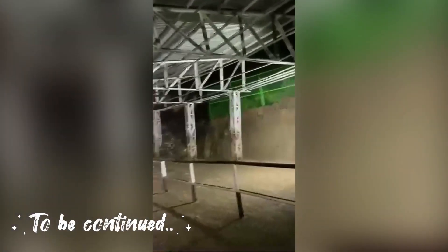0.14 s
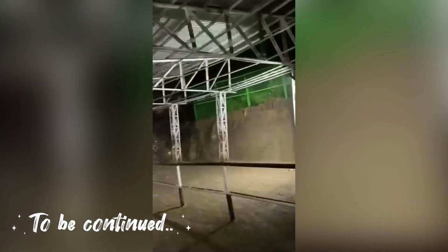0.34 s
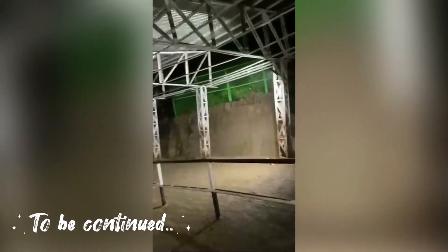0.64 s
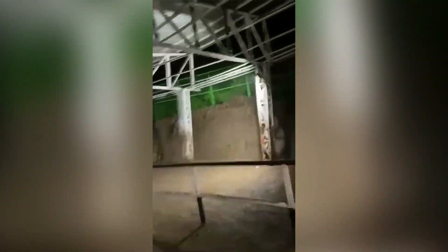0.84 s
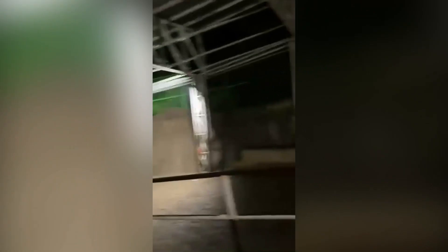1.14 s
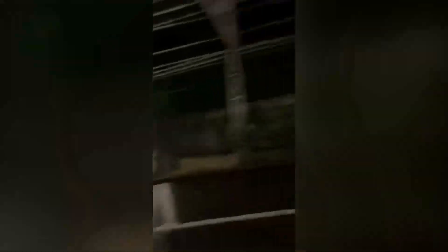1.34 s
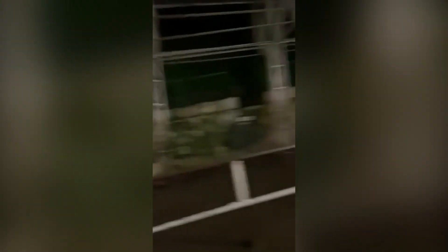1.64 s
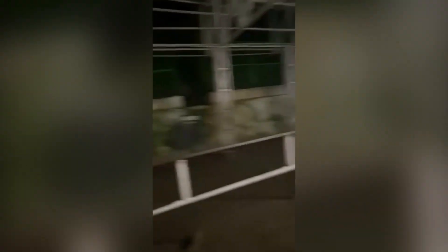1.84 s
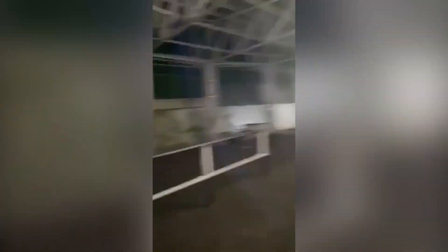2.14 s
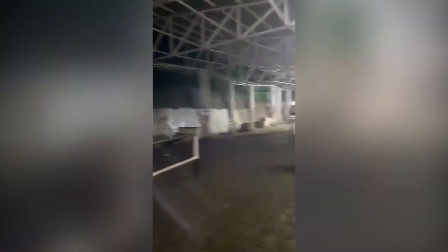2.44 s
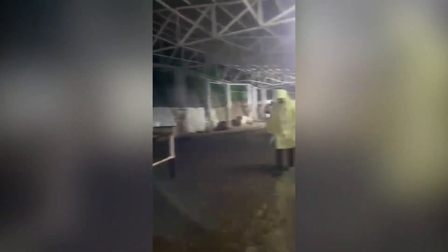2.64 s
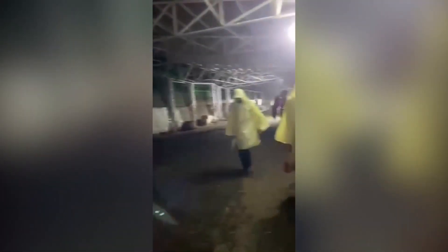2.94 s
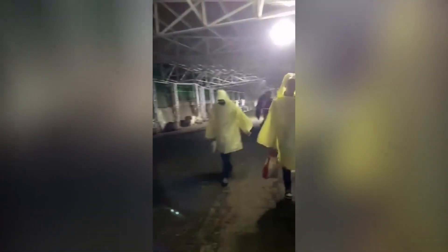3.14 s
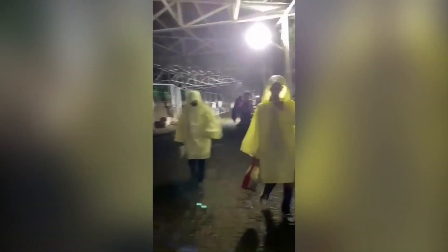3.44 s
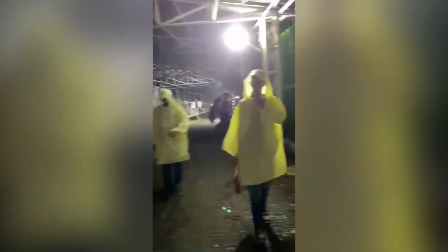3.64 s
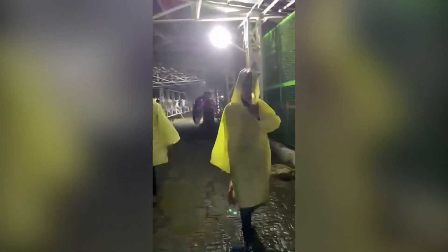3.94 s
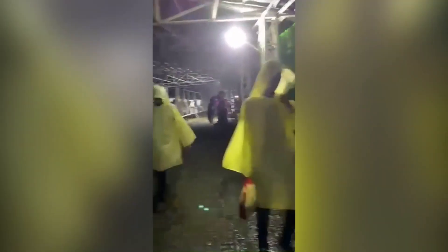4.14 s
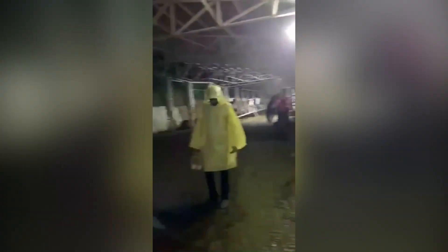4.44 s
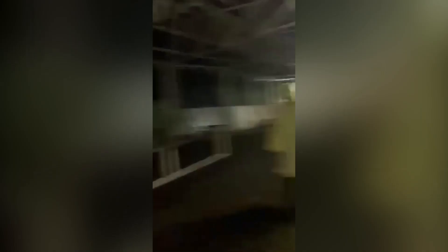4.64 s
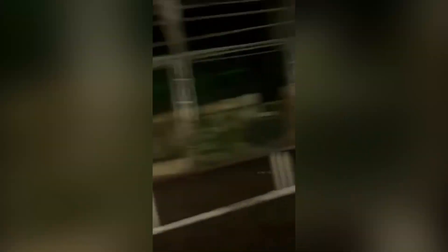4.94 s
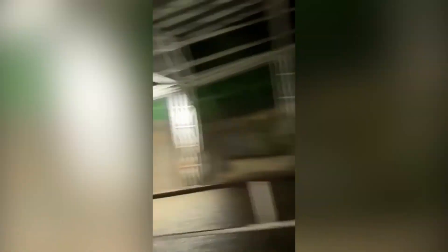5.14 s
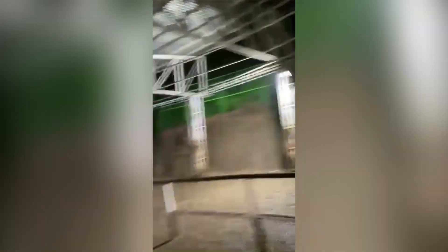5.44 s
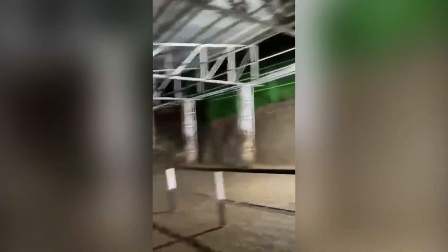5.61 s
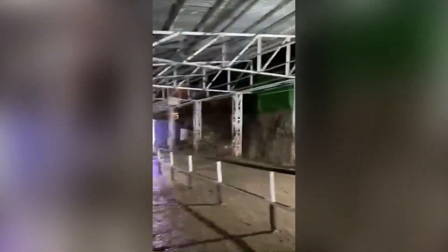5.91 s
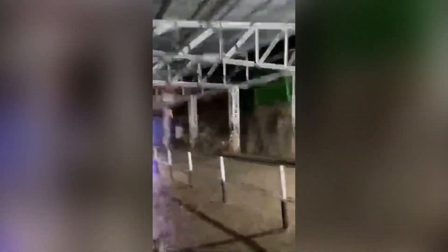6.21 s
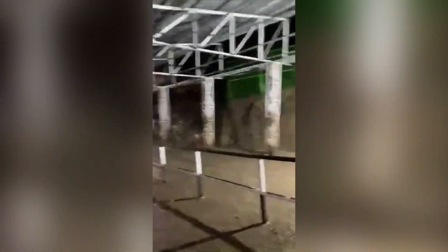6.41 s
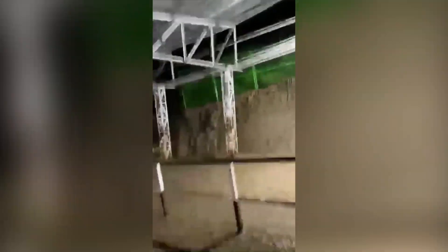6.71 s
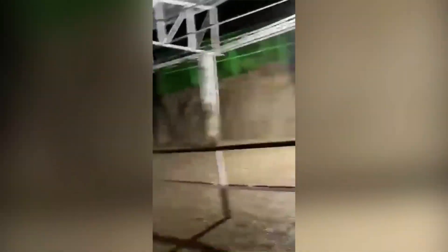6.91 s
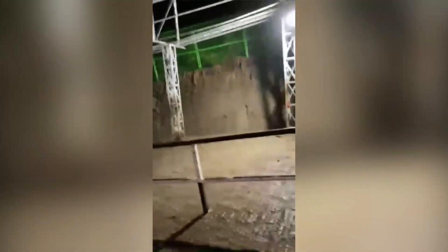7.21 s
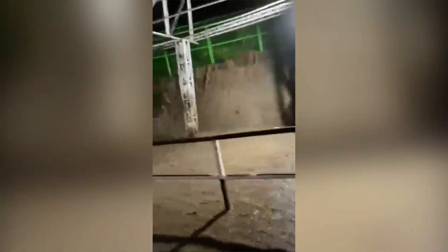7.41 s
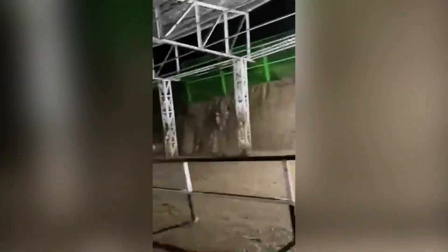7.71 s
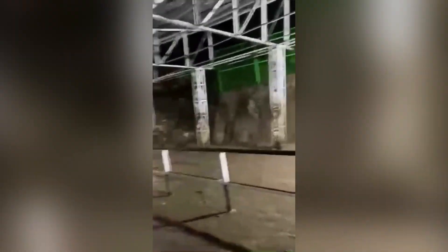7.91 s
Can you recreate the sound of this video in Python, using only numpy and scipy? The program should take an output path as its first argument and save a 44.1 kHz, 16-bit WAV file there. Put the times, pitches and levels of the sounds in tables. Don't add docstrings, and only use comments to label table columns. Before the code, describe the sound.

Heavy rain drums and hisses steadily on a long sheet-metal roof outdoors, slightly duller midway, with a bright rail ping and thin watery treble chirps.

```python
import sys
import numpy as np
from scipy import signal
from scipy.fft import rfft, irfft, next_fast_len
from scipy.io import wavfile
from scipy.ndimage import uniform_filter1d, map_coordinates

SR = 44100
rng = np.random.default_rng(int(sys.argv[2]) if len(sys.argv) > 2 else 0)


def to_wav(sig):
    pcm = np.clip(np.atleast_2d(sig), -1, 1) * 32767
    pcm = np.round(pcm).astype(np.int16)
    wavfile.write(sys.argv[1], SR, pcm.T)


def volts_from_decibels(level):
    exponent = np.asarray(level, float) / 20
    return 10 ** exponent


N = 355754
THIN_S = 3.2
FINE_HZ, FINEST_HZ = 5900, 6800


def unit(x):
    return x / np.sqrt(np.mean(x ** 2) + 1e-20)


def along(points, hz):
    f, v = np.transpose(points)
    return np.interp(np.log(hz + 1), np.log(f + 1), v)


def wobble(rate):
    knots = rng.standard_normal(int(N * 40 / SR) + 4)
    return map_coordinates(knots, [np.arange(N) * np.clip(rate, .1, 40) / SR])


def filtered(x, response):
    m = next_fast_len(N + 8192)
    return irfft(rfft(x, m) * response(np.fft.rfftfreq(m, 1 / SR)), m)[:N]


def rain():
    # frequency_hz, level_db (per Hz)
    drum_spectrum = [(18, -73.5), (25, -27.5), (32, -21), (40, -1), (60, 2.5), (85, 3.5), (108, 3.5),
                     (130, 6.5), (250, 5), (380, 3.5), (500, -16), (800, -24), (1300, -120)]
    # frequency_hz, level_db (per Hz)
    patter_spectrum = [(250, -19.5), (400, -1), (700, -2.5), (1000, -3.5), (1500, -4.5), (2200, -6.5),
                       (3000, -11), (3800, -26), (5000, -120)]
    # frequency_hz, level_db (per Hz)
    splash_spectrum = [(2200, -120), (2400, -14), (3000, 0), (4000, -.5), (4500, -2), (4900, -4.5),
                       (5600, -3), (6250, -3.7), (6330, -7), (6850, -9), (6920, -11.5), (7100, -14.5),
                       (7350, -20), (7420, -140)]
    # time_s, angle_deg
    heading = [(0, 28), (.5, 85), (1, 65), (1.6, 97), (2.3, 150), (3.5, 200), (4.5, 163), (5.1, 33),
               (5.8, 14), (6.5, 28), (7.3, 17), (8.07, 36)]
    t = np.arange(N) / SR
    angle = np.radians(np.interp(t, *np.transpose(heading)))
    away = (1 - np.cos(angle)) / 2
    gust = wobble(9)

    drum_db = -28 - 0.4 * away + 0.1838 * t + 0.22 * gust
    patter_db = -22 - 2.5 * away + 0.1 * gust + 0.047 * wobble(14)
    splash_db = -27 - 2 * away + 0.26 * gust + 0.41 * wobble(20)

    drum = drops(drum_spectrum, share=.02, spread_db=3.5, far_db=5.5, patchy_db=-0.13)
    patter = drops(patter_spectrum, share=.05, spread_db=3, far_db=6.0, patchy_db=.5)
    splash = drops(splash_spectrum, share=.08, spread_db=3.5, far_db=5.0, patchy_db=0.73)
    return volts_from_decibels(drum_db) * drum + volts_from_decibels(patter_db) * patter + thinning(volts_from_decibels(splash_db) * splash)


def drops(spectrum, share, spread_db, far_db, patchy_db):
    draw = rng.random((3, N))
    size = volts_from_decibels(-spread_db * np.log(np.maximum(draw[1], 1 / 40)))
    blows = unit((draw[0] < share) * size * np.sign(draw[2] - .5))
    mix = blows + volts_from_decibels(-3.5) * ringing(blows) + volts_from_decibels(far_db) * rng.standard_normal(N)

    z = signal.stft(mix, nperseg=512)[2]
    field = uniform_filter1d(rng.standard_normal(z.shape), size=5, axis=0)
    field = uniform_filter1d(field, size=10, axis=1)
    mix = signal.istft(z * volts_from_decibels(patchy_db * unit(field)), nperseg=512)[1][:N]
    return unit(filtered(mix, lambda hz: volts_from_decibels(along(spectrum, hz))))


def ringing(x):
    # frequency_hz, t60_s
    shelter = [(100, 0.28), (1000, 0.28), (6000, 0.12)]
    hz, t, z = signal.stft(rng.standard_normal(SR // 2), SR, nperseg=256)
    decay = volts_from_decibels(-60 * t / along(shelter, hz)[:, None])
    tail = signal.istft(z * decay, SR, nperseg=256)[1]
    out = np.zeros(N + SR)
    for part in np.array_split(np.arange(N), 24):
        signs = rng.choice([-1, 1], len(tail) // 64 + 1).repeat(64)[:len(tail)]
        answer = signal.fftconvolve(x[part], tail * signs)
        out[part[0]:part[0] + len(answer)] += answer
    return unit(out[:N])


def thinning(splash):
    early_db, late_db, flicker_db, over_s = .5, -3.5, 1.5, .3
    late = (1 + np.tanh((np.arange(N) / SR - THIN_S) / over_s)) / 2
    fine_db = early_db + (late_db - early_db) * late + flicker_db * wobble(10)
    fine = filtered(splash, lambda hz: np.clip((hz - FINE_HZ) / (FINEST_HZ - FINE_HZ), 0, 1))
    return splash + (volts_from_decibels(fine_db) - 1) * fine


def pings():
    # start_s, peak_db, pitch_hz, t60_s
    near_drops = [
        (.40, -22, 1100, .12),
        (3.708, -13, 4190, .045),
        (3.722, -20, 4120, .04),
        (5.29, -23, 3450, .08),
    ]
    out, t = np.zeros(N + SR), np.arange(SR // 5) / SR
    for s, db, hz, t60 in near_drops:
        pair = np.sin(2 * np.pi * hz * t) + .45 * np.sin(2 * np.pi * .94 * hz * t)
        attack = 1 - np.exp(-(t / .001) ** 2)
        out[round(s * SR):][:len(t)] += volts_from_decibels(db - 60 * t / t60) * attack * pair
    return out[:N]


def blips():
    # centre_s, peak_db, centre_hz, spread_hz
    bursts = [
        (.394, -59, 10680, 690),
        (1.509, -52, 7950, 690),
        (2.066, -49, 7930, 400),
        (2.089, -58, 11050, 30),
        (3.854, -51, 11200, 260),
        (4.318, -49, 7770, 580),
        (5.549, -46.5, 11440, 520),
        (6.060, -53.5, 11450, 280),
        (6.315, -47, 8060, 217),
    ]
    gain_db = 4
    out, t = np.zeros(N + SR), np.arange(-900, 900) / SR
    for s, db, hz, spread_hz in bursts:
        tones = hz + spread_hz * (rng.random((5, 1)) - .5)
        cluster = np.sin(2 * np.pi * (tones * t + rng.random((5, 1)))).sum(axis=0)
        swell = volts_from_decibels(db + gain_db) * np.hanning(len(t))
        out[round(s * SR) - len(t) // 2:][:len(t)] += swell * unit(cluster)
    return out[:N]


def panels():
    # frequency_hz, width_hz, level_db (rms)
    modes = [(108.7, 19, -39.5), (280, 47, -40), (378, 44, -47.5)]
    hum = np.zeros(N)
    for hz, width_hz, db in modes:
        def mode(f):
            damping = 1j * f * width_hz
            resonance = damping / (hz * hz - f * f + damping)
            return resonance ** 2 * (f < 8 * hz)

        hum += volts_from_decibels(db + 0.98 * wobble(2.4)) * unit(filtered(rng.standard_normal(N), mode))
    return hum


def scene():
    return np.tile(rain() + pings() + blips() + panels(), (2, 1))


def starved(x):
    # frequency_hz, signal_over_step_db
    step_ratio = [(200, 8), (800, 4), (1600, 1), (3000, -1.8), (4300, -3.2), (4850, -5.5), (5300, -3.8),
                  (6000, -6), (6250, -6.5), (6400, -10), (7500, -11)]
    # time_s, peak_db, pitch_hz
    chirps = [(0.046, -44, 6901), (0.139, -49, 6901), (0.139, -48, 6880), (0.185, -47, 6944),
              (0.301, -47, 6815), (0.348, -45, 6966), (0.418, -42, 6901), (0.441, -46, 6880),
              (0.487, -45, 6837), (0.534, -48, 6837), (0.627, -46, 6837), (0.719, -47, 6923),
              (0.766, -45, 6901), (0.766, -45, 7224), (0.789, -46, 6815), (0.859, -49, 6944),
              (1.091, -47, 6923), (1.161, -49, 6815), (1.23, -47, 7461), (1.532, -45, 6837),
              (1.532, -45, 6858), (1.625, -48, 7074), (1.695, -45, 7224), (1.741, -48, 6858),
              (1.764, -49, 6858), (1.788, -47, 6880), (1.834, -48, 6880), (1.857, -48, 6837),
              (1.904, -47, 7031), (1.973, -45, 6858), (2.043, -45, 6944), (2.043, -45, 7074),
              (2.205, -49, 6988), (2.205, -48, 6858), (2.205, -48, 7203), (2.205, -48, 7311),
              (2.345, -48, 6944), (2.345, -48, 7009), (2.368, -51, 6837), (2.414, -50, 6837),
              (2.531, -48, 6988), (2.623, -50, 6837), (2.716, -47, 6901), (2.74, -47, 6815),
              (2.763, -51, 6880), (2.925, -49, 6815), (2.972, -47, 6901), (2.972, -47, 6923),
              (2.995, -48, 7224), (3.041, -48, 7289), (3.134, -47, 6837), (3.181, -47, 7246),
              (3.413, -45, 6880), (3.97, -47, 6665), (4.063, -42, 6772), (4.086, -47, 6665),
                   (4.133, -47, 6600), (4.133, -47, 6794), (4.179, -45, 6988), (4.411, -42, 6665),
                   (4.551, -47, 6729), (4.551, -47, 6837), (4.597, -47, 7031), (4.597, -47, 7095),
                   (4.69, -47, 6665), (4.69, -47, 6729), (4.69, -46, 6600), (4.69, -46, 6621),
                   (4.69, -46, 6686), (4.713, -46, 6665), (4.713, -45, 6772), (4.76, -47, 6621),
                   (5.015, -44, 6751), (5.062, -44, 6923), (5.294, -46, 7052), (5.456, -44, 6686),
                   (5.642, -46, 6751), (5.642, -46, 6794), (5.642, -45, 6837), (5.712, -46, 6621),
                   (5.712, -46, 6708), (5.712, -46, 6858), (5.712, -46, 6880), (5.712, -45, 6578),
                   (5.712, -45, 6643), (5.712, -45, 6837), (5.712, -44, 6729), (5.99, -43, 6557),
                   (6.106, -44, 6772), (6.199, -45, 6772), (6.339, -41, 6708), (6.408, -41, 6621),
                   (6.64, -41, 6837), (6.687, -45, 6621), (6.78, -44, 7031), (6.826, -45, 6578),
                   (6.919, -46, 6557), (6.919, -46, 6578), (6.919, -46, 6621), (6.942, -44, 6621),
                   (6.942, -43, 6557), (6.989, -41, 6751), (7.058, -42, 6708), (7.337, -43, 6600),
                   (7.43, -44, 6557), (7.43, -44, 6794), (7.43, -44, 6880), (7.523, -45, 7009),
                   (7.639, -44, 6988), (7.685, -41, 6729), (7.755, -46, 6557), (7.871, -43, 6621),
              (3.761, -48, 6837),
        (3.831, -48, 6880),
        (3.831, -48, 7140),
        (3.854, -49, 6880),
        (4.829, -49, 6772),
        (4.876, -47, 6815),
        (6.548, -47, 7440),
        (7.244, -47, 6858),
    ]
    # time_s, centre_hz
    gaps = [(0.162, 4911), (0.232, 5988), (0.371, 4911), (1.207, 4911), (1.277, 4911), (1.323, 4911),
            (1.532, 5428), (1.811, 5988), (1.857, 4911), (2.205, 4911), (2.322, 5988), (2.623, 4911),
            (2.623, 5988), (2.972, 5988), (3.204, 4437), (3.297, 5988), (3.715, 4911), (3.738, 5988),
            (3.808, 4437), (3.831, 5428), (3.901, 5988), (4.017, 5988), (4.063, 4911), (4.063, 5988),
            (4.11, 5988), (4.202, 5428), (4.202, 5988), (4.249, 5988), (4.481, 4911), (4.551, 4437),
            (4.644, 5988), (4.713, 5988), (4.922, 5988), (4.969, 5988), (5.247, 4911), (5.619, 5988),
            (5.805, 5428), (5.874, 4437), (6.153, 4911), (6.269, 4911), (6.362, 4437), (6.431, 5988),
            (6.594, 5988), (6.617, 4911), (6.64, 4437), (6.64, 4911), (6.896, 4911), (7.012, 5988),
            (7.058, 4911), (7.151, 5988), (7.198, 4911), (7.384, 4911), (7.476, 4911), (7.662, 4437),
            (7.662, 4911)]
    gap_share = .105
    hop, first = 1024, 1005
    edge_early_hz, edge_late_hz, chirp_top_hz = 6800, 6545, 7600
    frame_swing_db, range_swing_db, round_up = 2.2, .8, .4

    n = np.arange(2 * hop)
    hz = (np.arange(hop) + .5) * SR / (2 * hop)
    hz = hz[hz < chirp_top_hz]
    rise = np.cumsum(np.kaiser(hop + 1, 4 * np.pi))
    window = np.sqrt(np.r_[rise[:-1], rise[-2::-1]] / rise[-1])
    lines = window[:, None] * np.cos(2 * np.pi * (n[:, None] + (hop + 1) / 2) * hz / SR)
    at = np.arange(first, N + 2 * hop, hop)[:, None] + n
    s = (at[:, hop] - hop) / SR
    full = np.pad(x, (hop, 4 * hop))[at] @ lines

    usual = uniform_filter1d(np.mean(full ** 2, axis=0), size=9)
    low = hz < FINE_HZ
    loudness = uniform_filter1d(np.mean(full[:, low] ** 2 / usual[low], axis=1), size=15)
    ranges = rng.standard_normal((len(s), len(hz) // 24 + 1)).repeat(24, axis=1)[:, :len(hz)]
    lean_db = frame_swing_db * rng.standard_normal((len(s), 1)).clip(-2, 1) + range_swing_db * ranges
    step = np.sqrt(np.abs(loudness[:, None] * usual) + 1e-12) * volts_from_decibels(lean_db - along(step_ratio, hz))
    kept = np.sign(full) * step * np.floor(np.abs(full) / step + round_up)

    def frame(time_s):
        return np.abs(s - time_s).argmin()

    for t, centre_hz in gaps:
        kept[frame(t), np.abs(hz - centre_hz) < gap_share * centre_hz / 2] = 0
    edge_hz = np.where(s < THIN_S, edge_early_hz, edge_late_hz)
    kept[hz > edge_hz[:, None]] = 0
    for t, db, line_hz in chirps:
        line = np.abs(hz - line_hz).argmin()
        kept[frame(t), line] = volts_from_decibels(db) * hop / np.sqrt(2) * rng.choice([-1, 1])

    change = (kept - full) @ lines.T * 2 / hop
    return x + np.bincount(at.ravel(), change.ravel())[hop:hop + N]


def low_pass(x):
    return signal.sosfilt(signal.butter(12, 11700, fs=SR, output="sos"), x)


def record(dry):
    start_db, settle_s = 1.5, 0.033
    settling = volts_from_decibels(start_db * np.exp(-np.arange(N) / SR / settle_s))
    mix = np.tile(starved(dry[0] * settling), (2, 1))
    return low_pass(mix)


dry = scene()
out = record(dry)
to_wav(out)
```